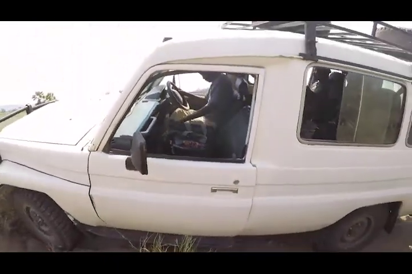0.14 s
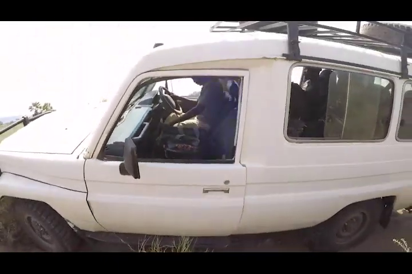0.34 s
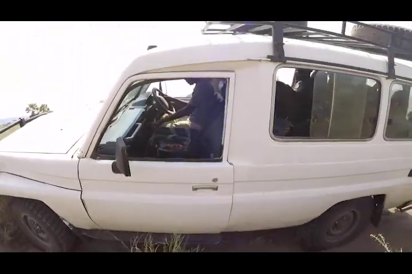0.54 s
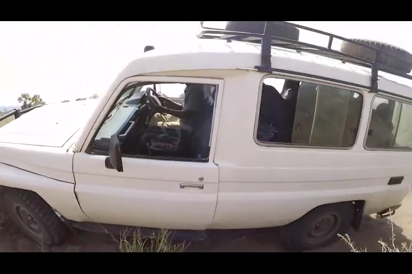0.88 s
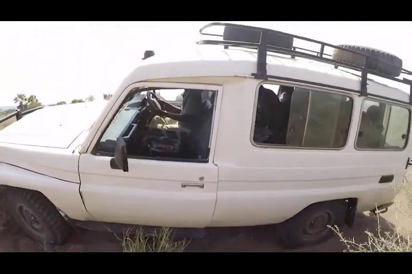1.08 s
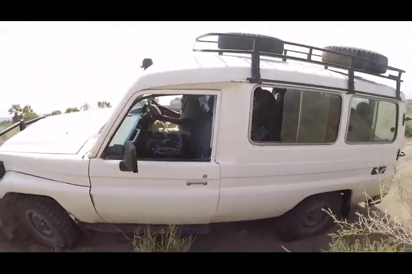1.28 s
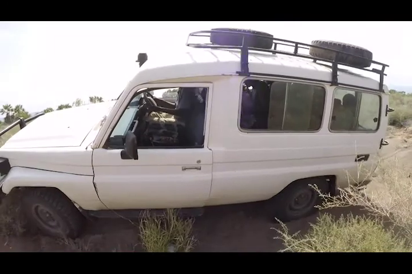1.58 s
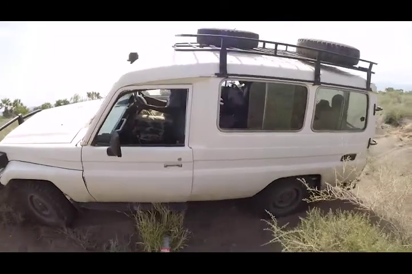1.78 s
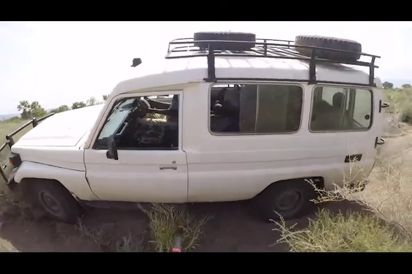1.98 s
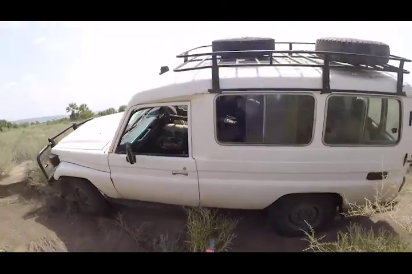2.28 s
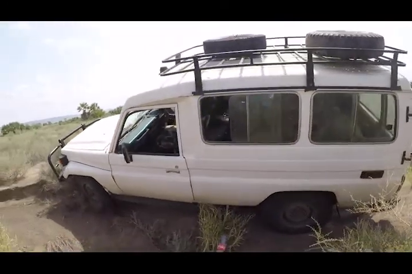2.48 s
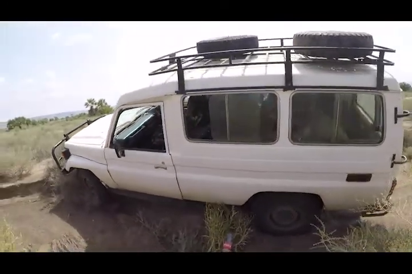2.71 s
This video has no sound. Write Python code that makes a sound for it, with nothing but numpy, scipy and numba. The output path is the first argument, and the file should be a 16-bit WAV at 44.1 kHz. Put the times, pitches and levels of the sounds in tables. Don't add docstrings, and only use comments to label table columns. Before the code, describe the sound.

A diesel off-road vehicle starts at a low, fairly quiet idle, swells quickly, then sags to a lumpy chug around 0.7 s. From 0.9 s it revs up, growing louder, with clatter, dull body booms and hard rattles until about 2.1 s. Pitch then climbs fast to a roar at 2.85 s, with sharp twig snaps and sand patter from 2.3 s and a faint late whistle. Dry outdoors, close microphone, light wind buffeting.

```python
import sys
import numpy as np
from scipy import signal
from scipy.io import wavfile
from scipy.ndimage import uniform_filter1d
from numba import njit

SR = 44100
rng = np.random.default_rng(int(sys.argv[2]) if len(sys.argv) > 2 else 0)


def to_wav(sig):
    pcm = np.clip(np.atleast_2d(sig), -1, 1) * 32767
    pcm = np.round(pcm).astype(np.int16)
    wavfile.write(sys.argv[1], SR, pcm.T)


def volts_from_db(level):
    exponent = np.asarray(level, float) / 20
    return 10 ** exponent


N = 125685

# (time [s], firing rate [Hz], exhaust level [dB], clatter level [dB], throttle bite [dB per order])
ENGINE_RUN = [(0.0, 32.36, -32, -50.5, -7), (0.12, 35.84, -25.5, -43.5, -5), (0.25, 37.32, -23, -41, -3.5),
              (0.32, 37.66, -24, -43.5, -2), (0.4, 33.93, -21, -41, -10), (0.43, 33.07, -23, -43.5, -2),
              (0.679, 28.38, -23, -40.5, -2), (0.71, 28.22, -23.5, -41, -4), (0.871, 31, -22.5, -40, -2.5),
              (1.09, 39.83, -18.5, -37.5, -5), (1.19, 40.74, -18, -38.5, -8),
              (1.622, 45.08, -15, -34.5, -1), (1.999, 48.19, -14, -34.5, -1.5),
              (2.091, 51.71, -15.5, -35, -0.5), (2.3, 61.69, -12, -33.5, -5.5),
              (2.55, 72.24, -12.5, -33.5, -5), (2.709, 85.42, -9, -32, -2), (2.85, 90.7, -8.5, -31.5, -3.5)]
# (centre [Hz], width [Hz], level [dB])
PIPE_MODES = [(35, 8.6, -1), (52.3, 4.25, 11), (77.5, 20.4, 4), (134.6, 26, 4.5), (175.7, 23.6, 7.5),
              (206, 14, 6.5), (257.5, 33, -1), (357, 21, -1.5), (404, 50, -1)]
ORDER_LEVEL_DB = [0, 0, 0, -5, -10, -12, -13, -14]
# (time [s], first [dB], second [dB], third [dB])
DRONE_GAIN = [(0, 4.5, -1.5, -3), (.3, -5, -10, -15), (.42, -23, 6.5, -19), (.55, 4.5, 4, 1),
              (.68, 6, 6.5, -6), (.82, 0, 11.5, -9), (.95, 4.5, 0, 4), (1.1, -6, 1, 4.5),
              (1.25, -5, -4.5, 4.5), (1.4, 2.5, -1, -2), (1.65, 2.5, -6, -0.5), (1.75, -1.5, -3, 0.5),
              (1.95, -2.5, -5, 1), (2.15, 2.5, 0, -4.5), (2.4, -2.5, -2.5, -2.5), (2.55, -2, -14.5, 0),
              (2.65, -4.5, 0, -1.5), (2.85, 3.5, -7, 0.5)]
CYLINDER_KNOCK_DB = [-8, -7.5, -6.5, -5, -8, -6.5]
# (centre [Hz], width [Hz], level at 1.5 s [dB], drift [dB/s])
ROAR_BANDS = [(65, 38.5, -2, -2.6), (144.6, 108, -3, -0.3), (297, 130, -6.5, -0.94), (370, 97, -15, 1),
              (526, 520, -18.5, 5.5)]
# (centre [Hz], width [Hz], level at 1.5 s [dB], drift [dB/s])
BLOCK_MODES = [(720, 730, 5, -3), (1060, 90, -5, 3.5), (1274, 195, -2.5, -7.5), (1444, 210, -6.5, 3),
               (1587, 110, -3.5, -4.5), (1993, 440, -0.5, -5), (1670, 960, -3, -4.5), (2400, 560, -10.5, 2)]
# (centre [Hz], width [Hz], level at 1.5 s [dB], drift [dB/s])
HISS_BANDS = [(3380, 480, -41, 22), (4500, 1670, -4.5, 2), (5660, 870, -4, 2.9), (7200, 4500, -7, -0.3),
              (9030, 2100, -17, -2), (12850, 2600, -25, 1.5)]
# (time [s], length [s])
CRUNCH_TIMES = [(.236, .022), (.388, .02), (2.363, .012), (1.015, .02), (2.272, .014)]
# (level [dB], centre [Hz], treble level [dB])
CRUNCH_COLOURS = [(-31.5, 1250, -11), (-32.5, 2200, -9), (-30, 900, -12), (-38, 1400, -20),
                  (-33, 1040, -30)]
# (time [s], length [s], pitch [Hz], level [dB])
PANEL_BOOMS = [(0.254, 0.025, 172, -36), (0.616, 0.052, 163, -33), (0.726, 0.032, 159, -33),
               (0.884, 0.023, 169, -23), (1.309, 0.049, 274, -34.5), (1.506, 0.038, 316.1, -25.5),
               (1.74, 0.036, 221, -22), (2.097, 0.053, 292, -28)]
# (time [s], peak level [dB], pitch [Hz])
BLOCK_RATTLES = [(0.4967, -27.5, 1830), (0.602, -28, 1282), (0.634, -31.5, 1940), (0.6733, -42, 1960),
                 (0.7446, -29, 1450), (0.817, -28, 1670), (1.017, -28.5, 1657), (1.1448, -30, 2120),
                 (1.167, -24, 1326), (1.2635, -30, 1690), (1.3094, -32, 1310), (1.3857, -32, 1300),
                 (1.4515, -36, 1470), (1.541, -22.5, 1560), (1.5937, -20.5, 1490), (1.6546, -24.5, 1424),
                 (1.7163, -24, 2045), (1.7825, -26, 1472), (1.853, -23.5, 1535), (2.015, -25, 1580),
                 (2.0732, -30, 1483), (2.157, -26, 1570)]
# (time [s], peak level [dB], pitch [Hz], treble peak [dB])
TWIG_SNAPS = [(1.8044, -34, 5830, -40), (2.2047, -33, 7500, -40), (2.2935, -43, 5370, -42),
              (2.3231, -36, 6726, -65), (2.3603, -20.5, 6410, -42), (2.4478, -29, 7500, -50),
              (2.4787, -21, 5880, -33), (2.4895, -15, 6140, -29), (2.5385, -21, 4650, -42),
              (2.5833, -18, 5906, -49), (2.5898, -25, 6570, -45), (2.5927, -24, 7620, -42),
              (2.626, -24, 6070, -51), (2.64, -24, 7600, -45), (2.659, -19, 6700, -29),
              (2.6876, -19, 5000, -38), (2.694, -34, 7460, -52), (2.7094, -52, 8000, -43),
              (2.7441, -44, 7035, -47), (2.766, -39, 6000, -34)]
WHISTLE_START_S = [2.705, 2.76, 2.59, 2.705]
# (pitch [Hz], rise [Hz/s], level [dB], growth [dB/s])
WHISTLE_TONES = [(5910, 600, -33, 22), (5600, 1900, -40, 35), (5520, 1500, -43, -5), (5800, 500, -38, 25)]


def level(x, db):
    return x * volts_from_db(db) / np.sqrt(np.mean(x ** 2))


@njit
def svf(x, hz, width_hz):
    y, band, low = np.empty(len(x)), 0., 0.
    g, k = np.tan(np.pi * hz / SR), width_hz / hz
    for i in range(len(x)):
        v = (band + g * (x[i] - low)) / (1 + g * (g + k))
        band = 2 * v - band
        low += 2 * g * v
        y[i] = k * v
    return y


def noise():
    return rng.standard_normal(N)


def walk(rate_hz):
    hold = int(SR / rate_hz)
    steps = np.repeat(rng.standard_normal(N // hold + 1), hold)
    return 0.873 * uniform_filter1d(uniform_filter1d(steps, hold), hold)[:N]


def ring(x, modes):
    out = 0
    for hz, width_hz, db in modes:
        once = svf(x, 1. * hz, 1.24 * width_hz)
        out = out + volts_from_db(db) * svf(once, 1. * hz, 1.24 * width_hz)
    return out


def bands(modes, gate, flicker_db, tilt_db=0):
    out = 0
    for hz, width_hz, db in modes:
        treble_db = tilt_db * max(np.log2(hz / 5700), 0) ** 2
        gain = volts_from_db(db + flicker_db * walk(15) + treble_db)
        out = out + gain * level(ring(noise() * gate, [(hz, width_hz, 0)]), 0)
    return out


def tilted(modes, t):
    return [(hz, width_hz, db + drift_db_s * (t - 1.5)) for hz, width_hz, db, drift_db_s in modes]


@njit
def fire(hz, stretch):
    turn, p = np.empty(len(hz)), 0.
    for i in range(len(hz)):
        p += hz[i] * stretch[int(p)] / SR
        turn[i] = p
    return turn


def firings(hz):
    jitter, lag_cycles, scatter_db, decay_cycles = .006, .3, 1.2, .4
    chance = rng.standard_normal((400, 2)).T
    turn = fire(hz, 1 + jitter * chance[0])
    count = (turn + lag_cycles).astype(int)
    phase = (turn + lag_cycles) % 1
    peak_db = np.array(CYLINDER_KNOCK_DB)[count % 6] + scatter_db * chance[1][count]
    knock = uniform_filter1d(volts_from_db(peak_db) * np.exp(-phase / decay_cycles), size=150)
    return turn, phase, knock


def pipe_gain(hz):
    return sum(volts_from_db(db) / (1 + 1j * (hz / f - f / hz) * f / w) for f, w, db in PIPE_MODES)


def exhaust(t, hz, turn, bite_db):
    uneven_db, uneven_fade_db_hz, uneven_wander_db, order_wander_db = -13, .04, 3.5, 1.4
    drone = np.array(DRONE_GAIN)
    out, start = 0, rng.random(24)
    for n in range(1, 25):
        order = n / 3
        between = n % 3 > 0
        db = np.interp(order, np.arange(1, 9), ORDER_LEVEL_DB) + bite_db * (order - 2)
        if between:
            db = db + uneven_db - uneven_fade_db_hz * (hz - 40) + uneven_wander_db * walk(12)
        else:
            db = db + order_wander_db * walk(21.98)
        if n in (3, 6, 9):
            db = db + np.interp(t, drone[:, 0], drone[:, n // 3])
        gain = np.repeat(pipe_gain(order * hz[::32]), 32)[:N]
        tone = np.exp(2j * np.pi * (order * turn + between * start[n - 1]))
        out = out + volts_from_db(db) * (gain * tone).real
    return level(out, 0)


def gas_roar(t, knock):
    return volts_from_db(-10) * bands(tilted(ROAR_BANDS, t), .6 + knock, 1.0)


def block_clatter(t, hz, knock):
    steady = .3 + 0.013 * (hz - 30)
    return level(bands(tilted(BLOCK_MODES, t), steady + knock, 1.7), 0)


def gas_hiss(t, load_db, knock):
    top_tilt = 0.19
    hiss = bands(tilted(HISS_BANDS, t), 1 + knock, 0.76, top_tilt * (load_db + 40))
    return hiss * volts_from_db(-6.5 + 0.13 * walk(5.52))


def fan(t):
    idle_db, fade_db_s = -46.5, 17
    return bands([(5100, 2000, idle_db - fade_db_s * t)], 1, 0.71)


def breeze(t):
    lurch_s, lurch_len_s, lurch_hz, lurch_db = 2.17, .06, 15, -15
    age = t - lurch_s
    lurch = volts_from_db(lurch_db) * np.exp(-(age / lurch_len_s) ** 2) * np.sin(2 * np.pi * lurch_hz * age)
    gusts = volts_from_db(2.0 * walk(4.5) + 2 * t)
    return level(ring(noise(), [(26, 41, 0)]) * gusts, -28) + lurch


def crunches(t):
    out = 0
    for (s, length_s), (db, hz, top_db) in zip(CRUNCH_TIMES, CRUNCH_COLOURS):
        rise = np.clip((t - s) / .003, 0, 1)
        fall = np.exp(-np.maximum(t - s - length_s / 2, 0) / (length_s * .45))
        grit = noise()
        body = level(ring(grit, [(hz, 0.49 * hz, 0)]), 0)
        treble = level(ring(grit, [(5240, 600, 0)]), top_db)
        out = out + volts_from_db(db) * rise * fall * (body + treble)
    return out


def booms(t):
    out, grit = 0, noise()
    for s, length_s, hz, db in PANEL_BOOMS:
        swell = np.exp(-((t - s) / length_s) ** 2)
        out = out + swell * level(ring(grit, [(hz, 0.15 * hz, 0)]), db)
    return out


def rattles(t):
    rise_s, decay_s, rms_below_peak_db = .004, .014, 8
    out, grit = 0, noise()
    for s, db, hz in BLOCK_RATTLES:
        age = np.maximum(t - s, 0)
        env = np.clip(age / rise_s, 0, 1) * np.exp(-age / decay_s)
        out = out + env * level(ring(grit, [(hz, .42 * hz, 0)]), db - rms_below_peak_db)
    return out


def panel_rasp(t, knock):
    labour = np.exp(-((t - 1.55) / .6) ** 2)
    return labour * bands([(1500, 200, -40.5)], .5 + knock, 2.0)


def snaps(t):
    tick_s, ring_s, treble_gain_db, tail_db = 0.0007, 0.0013, 7, -12
    patter_s, patter_len_s, patter_db, spread_db = 2.63, .09, -47, 3.5
    out, grit, span = np.zeros(N), noise(), SR // 50
    age = t[:span]
    bright = [(13300, 3500, 0), (9500, 4000, -2)]
    for s, db, hz, top_db in TWIG_SNAPS:
        i = int(s * SR)
        treble = (bright, top_db + treble_gain_db, tick_s)
        body = ([(hz, hz * 0.5, 0)], db, ring_s)
        for modes, peak_db, decay_s in (treble, body):
            dust = volts_from_db(tail_db) * grit[i:i + span] * np.exp(-age / decay_s)
            hit = ring((age == 0) + dust, modes)
            out[i:i + span] += hit * volts_from_db(peak_db) / np.abs(hit).max()
    struck = rng.random(N) < 900 / SR
    grains = struck * volts_from_db(spread_db * rng.exponential(size=N)) * np.sign(grit)
    shower = np.exp(-((t - patter_s) / patter_len_s) ** 2)
    return out + shower * level(ring(grains, bright), patter_db)


def whistles(t, phase):
    out = 0
    for s, (hz, rise_hz_s, db, grow_db_s) in zip(WHISTLE_START_S, WHISTLE_TONES):
        since = t - s
        bend_hz = 30 * walk(120) + 35 * np.sin(2 * np.pi * phase)
        tone = np.sin(2 * np.pi * np.cumsum(hz + rise_hz_s * since + bend_hz) / SR)
        onset_db = 400 * np.minimum(since, 0)
        out = out + tone * volts_from_db(db + grow_db_s * since + onset_db + 2 * walk(50))
    return out * (1 + .6 * np.cos(2 * np.pi * (phase - .3)))


def engine(t):
    s, *columns = np.array(ENGINE_RUN).T
    hz, exhaust_db, load_db, bite_db = [np.interp(t, s, column) for column in columns]
    turn, phase, knock = firings(hz)
    tailpipe = volts_from_db(exhaust_db) * (exhaust(t, hz, turn, bite_db) + gas_roar(t, knock))
    block = volts_from_db(load_db) * (block_clatter(t, hz, knock) + gas_hiss(t, load_db, knock))
    return tailpipe + block + fan(t) + panel_rasp(t, knock) + whistles(t, phase)


def scene():
    t = np.arange(N) / SR
    mix = engine(t) + breeze(t) + crunches(t) + booms(t) + rattles(t) + snaps(t)
    return mix[None]


def band_limit(x):
    return signal.sosfilt(signal.butter(12, 15470, fs=SR, output="sos"), x)


def record(dry):
    rounded = np.tanh(1.044 * dry) / 1.143
    top_cut = signal.ellip(8, .3, 60, 15350, fs=SR, output="sos")
    mix = signal.sosfilt(top_cut, rounded)
    return band_limit(mix)


dry = scene()
out = record(dry)
to_wav(out)
```